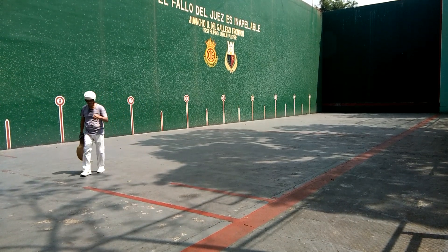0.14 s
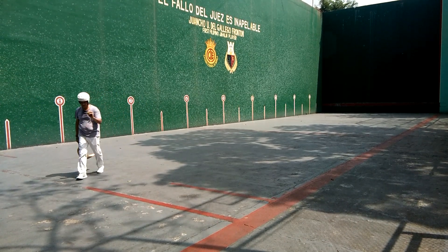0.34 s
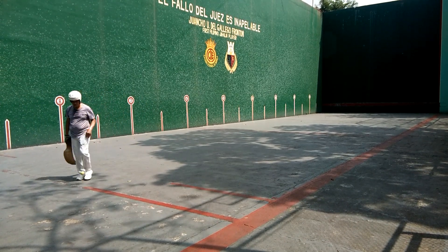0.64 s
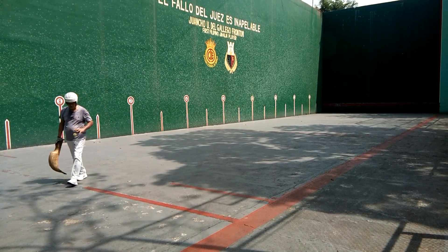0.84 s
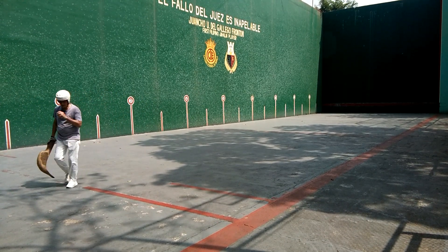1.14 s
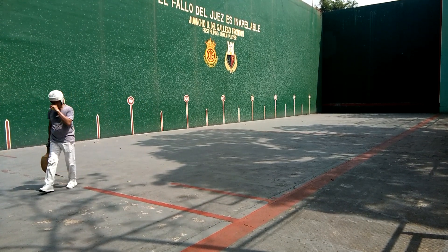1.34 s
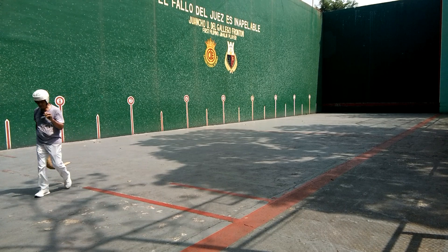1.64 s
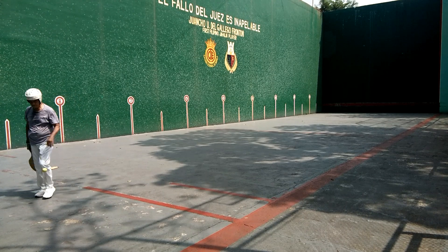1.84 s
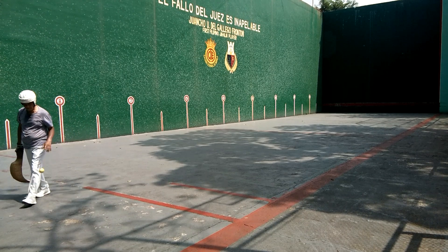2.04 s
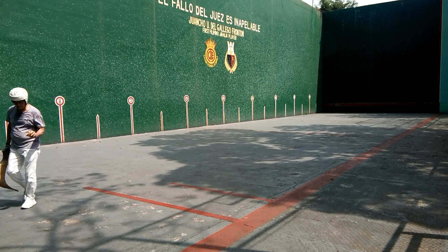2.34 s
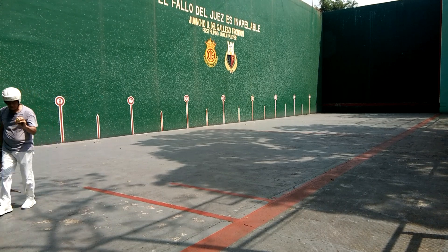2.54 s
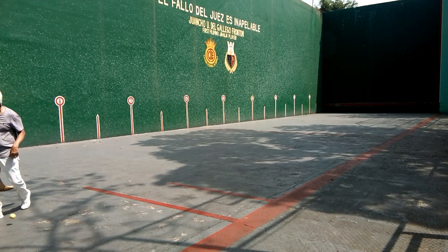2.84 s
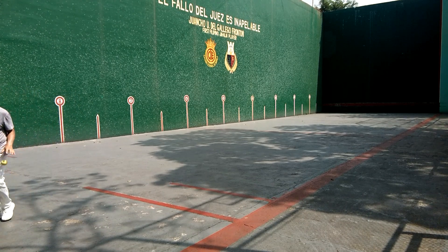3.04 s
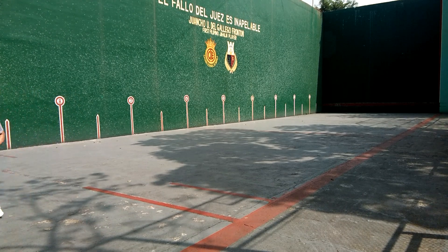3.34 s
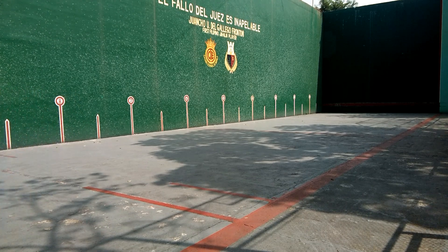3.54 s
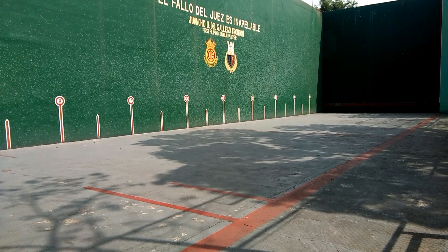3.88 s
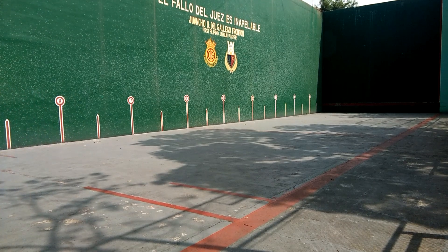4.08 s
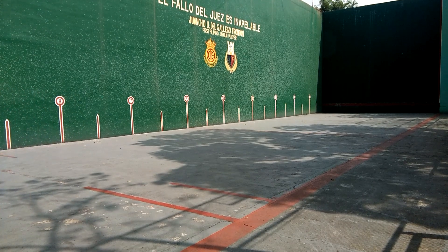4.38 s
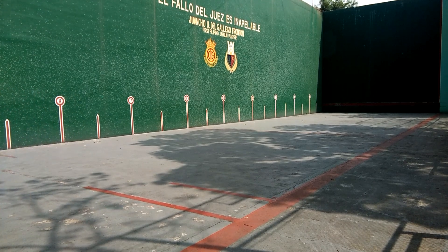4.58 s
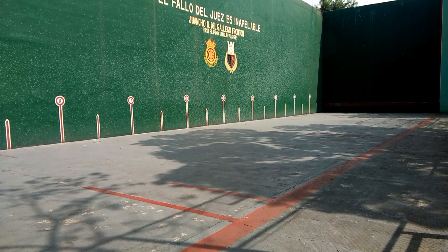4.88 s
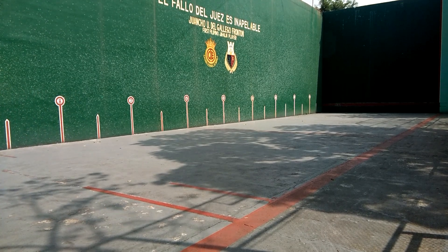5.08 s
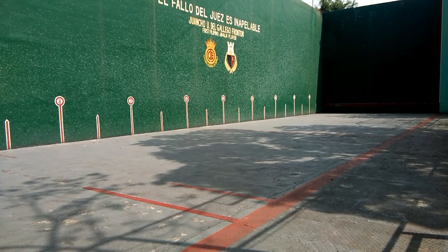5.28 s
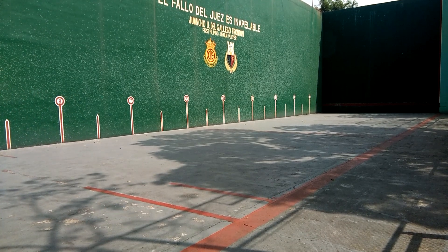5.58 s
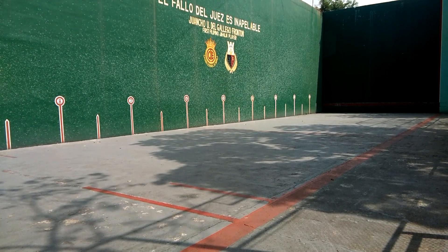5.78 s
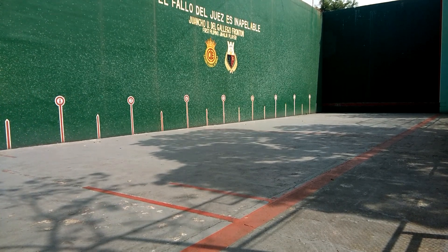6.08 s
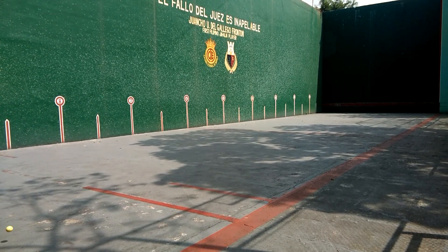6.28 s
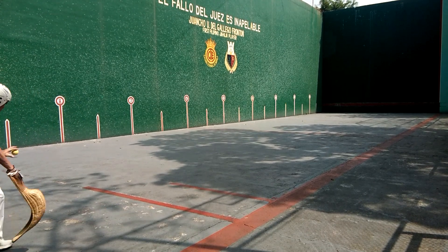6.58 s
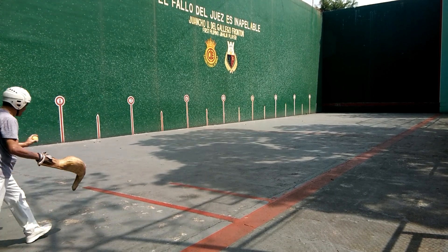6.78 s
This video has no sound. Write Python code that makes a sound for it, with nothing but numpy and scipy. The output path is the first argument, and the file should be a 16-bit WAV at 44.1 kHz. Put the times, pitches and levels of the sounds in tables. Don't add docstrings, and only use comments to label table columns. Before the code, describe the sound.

Six sharp cracks of a small hard ball bouncing on a concrete court, with slapping wall echoes, over buffeting wind and faint town hum.

```python
import sys
import numpy as np
from scipy import signal
from scipy.io import wavfile
from scipy.ndimage import map_coordinates

SR = 44100
rng = np.random.default_rng(int(sys.argv[2]) if len(sys.argv) > 2 else 0)


def gain_from_decibels(decibels):
    exponent = np.asarray(decibels, float) / 20
    return 10 ** exponent


def unload_audio(sound):
    columns = np.transpose(np.atleast_2d(sound))
    steps = np.round(np.clip(columns, -1, 1) * 32767)
    wavfile.write(sys.argv[1], SR, steps.astype(np.int16))


N = 305172


def curve(rows):
    s, *columns = np.transpose(rows)
    return [np.interp(np.arange(N) / SR, s, c) for c in columns]


def band(x, low_hz, high_hz, order=2):
    sos = signal.butter(order, [low_hz, min(high_hz, .45 * SR)], "band", fs=SR, output="sos")
    return signal.sosfilt(sos, x)


def unit(x):
    return x / np.sqrt(np.mean(x ** 2) + 1e-20)


def drift(rate):
    coarse = np.arange(0, N + 32, 32)
    knots = rng.standard_normal(1000)
    slow = map_coordinates(knots, [coarse / SR * rate * 2], order=3)
    return np.interp(np.arange(N), coarse, slow)


def add(out, s, shape):
    i = round(s * SR)
    out[i:i + len(shape)] += shape[:len(out) - i]


def swell(length_s, sharp):
    return np.sin(np.pi * np.arange(round(length_s * SR)) / round(length_s * SR)) ** sharp


def slab_wave(lead_ms, db, last_hz, hang_ms):
    t = np.arange(round(.04 * SR)) / SR * 1000 - lead_ms
    first_hz = 400 + 110 * lead_ms
    hz = last_hz + (first_hz - last_hz) * np.sqrt(np.clip(-t / lead_ms, 0, 1))
    phase = np.cumsum(2 * np.pi * hz / SR)
    phase -= phase[np.argmin(abs(t))]
    growth = np.exp(8 * t / lead_ms ** 2) * np.clip((t + lead_ms) / 1.5, 0, 1)
    decay = np.exp(-t / hang_ms * 2.5)
    size = np.where(t < 0, growth, decay)
    octave = .35 * np.exp(-(t / 2.5) ** 2) * np.sin(2 * phase)
    return -gain_from_decibels(db) * size * (np.sin(phase) + octave)


LEAD_S = .0014


def air_blow(push_db, crack_db, crack_hz, knock_db, near_ms, grit):
    t = np.arange(len(grit)) / SR
    push, bright = np.zeros((2, len(t)))
    add(push, LEAD_S + 0.00027, swell(0.001059, sharp=1.38))
    add(push, 0, -.42 * swell(0.00464, sharp=0.82))
    push = gain_from_decibels(push_db) * (push + .5 * band(push, 1057, 1910, order=1))
    crack = np.sin(2 * np.pi * crack_hz * t) * (t / 0.000086) * np.exp(1 - t / 0.00017) * 0.53
    crack += .5 * band(grit, .68 * crack_hz, 1.4 * crack_hz) * np.exp(-t / .0006)
    crack += 0.079 * band(grit, 6300, 14930) * np.exp(-t / 0.0032)
    knock = band(grit[::-1], 3050, 4430) * (t / 0.0023) * np.exp(1 - t / 0.0012)
    add(bright, LEAD_S, gain_from_decibels(crack_db) * crack + gain_from_decibels(knock_db) * knock)
    lag = round(near_ms * SR / 1000)
    return push + gain_from_decibels(-12.5) * np.roll(push, lag), bright + gain_from_decibels(-7.0) * np.roll(bright, lag)


def ping(db, hz, decay_ms):
    t = np.arange(1500) / SR
    age = t * 1000 / decay_ms
    return gain_from_decibels(db) * np.sin(2 * np.pi * hz * t) * (1 - np.exp(-3 * age)) ** 2 * np.exp(-age)


# time in seconds, push in dB, crack in dB, crack pitch in Hz, knock in dB.
BLOWS = [(.7333, -16.5, -19, 11000, -22.5), (2.0459, -16.5, -21, 13100, -34),
         (2.9712, -16, -21.5, 13100, -24.5), (4.2419, -9, -32, 11000, -25.5),
         (5.4882, -16, -25, 10120, -22), (6.4026, -23.5, -28, 9960, -27.5)]
# frequency in Hz, start in ms after the push, decay in ms.
SHELL_MODES = [(1260, 0.4, 4.0), (1560, -0.4, 4.0), (2950, -0.2, 1.3), (3950, 1.8, 4.0), (5300, 0.2, 1.2)]
MODE_LEVELS = [(-29.5, -31, -29, -42.5, -55), (-36, -34, -33, -37, -42), (-30, -32, -33, -49, -35.5),
               (-25.5, -31, -26, -38, -35.5), (-26, -40, -42, -29.5, -32), (-36, -30.5, -32, -43, -41)]


def shell():
    out = np.zeros(N)
    for (s, _, crack_db, crack_hz, _), levels_db in zip(BLOWS, MODE_LEVELS):
        add(out, s, ping(crack_db - 4.5, 0.761 * crack_hz, decay_ms=0.66))
        for (hz, start_ms, decay_ms), db in zip(SHELL_MODES, levels_db):
            add(out, s + start_ms / 1000, ping(db, hz, decay_ms))
    return out


# crest in seconds, lead in ms, level in dB, last pitch in Hz, hang in ms.
SLAB_WAVES = [(.7315, 7.3, -34.5, 700, 1.3), (2.044, 7.4, -33.5, 520, 3.0), (2.9684, 3.44, -18, 412, 6.2),
              (4.2408, 4, -14, 593, 5.2), (5.4872, 3.76, -17.5, 506, 2.7), (6.4017, 3.2, -23, 476, 5.4)]
NEAR_MS = [3, 3.2, 1.9, 2.6, 3.5, 6.9]
# time in seconds, thud in dB, crack in dB, shell ring in dB.
ECHOES = [(0.770, -22, -32, -40), (.816, -38, -32, -46), (0.9088, -25.5, -47, -49.5),
          (2.065, -33, -31, -57), (2.128, -39, -31, -52), (2.9766, -6, -36, -60), (3.015, -22, -26, -62),
          (3.0542, -20, -19, -63), (4.284, -18.5, -34, -60), (4.325, -25, -19, -59), (5.502, -20, -25, -60),
          (5.5356, -14.5, -24, -38), (5.572, -26.5, -23, -54), (5.6039, -31, -16.5, -53),
          (5.6746, -43, -46, -56), (6.4081, -12, -28, -60), (6.414, -9.5, -31, -62),
          (6.4216, -15, -27, -60), (6.445, -24, -24, -58), (6.4854, -24.5, -23, -64)]


def ball():
    direct, echoes = shell(), np.zeros(N)
    grit = rng.standard_normal((len(BLOWS), 2000))
    next_s = [row[0] for row in BLOWS[1:]] + [N / SR]
    for (s, *blow), slab, near_ms, noise, until in zip(BLOWS, SLAB_WAVES, NEAR_MS, grit, next_s):
        crest_s, lead_ms, *wave_settings = slab
        wave_s = crest_s - lead_ms / 1000
        wave = slab_wave(lead_ms, *wave_settings)
        push, bright = air_blow(*blow, near_ms, noise)
        add(direct, s - LEAD_S, push + bright)
        add(direct, wave_s, wave)
        for echo_s, thud_db, crack_db, ring_db in ECHOES:
            if s < echo_s < until:
                add(echoes, echo_s - LEAD_S, gain_from_decibels(thud_db) * push + gain_from_decibels(crack_db) * bright)
                add(echoes, echo_s - s + wave_s, gain_from_decibels(thud_db) * wave)
                add(echoes, echo_s, ping(ring_db, hz=3700, decay_ms=2.2))
    direct = band(direct, 110, 19000)
    smear = rng.standard_normal(200) * np.exp(-np.arange(200) / 22.)
    return direct, np.convolve(echoes, smear / np.sqrt(np.sum(smear ** 2)))[:N]


# frequency in Hz, tail level in dB, t60 in seconds.
COURT_TAIL = [(199, 6, 0.29), (527, -1.5, 0.83), (1207, -1, 0.67), (1860, -12, 0.81), (2420, -7, .6),
              (3050, -2, .7), (3850, 2, .7), (4850, -12, .5), (6120, -16, 0.88), (11000, -6, 0.57),
              (14700, 5.5, 0.84), (16000, -8, 0.39)]
# thud, ring, crack and top, all in dB.
FILL = [(-54, -65, -56, -65), (-56, -68, -60, -63), (-55, -67, -56.5, -65), (-53.5, -68, -62, -71.5),
        (-54.5, -63, -56, -68), (-54.5, -69, -59.5, -67)]


def court():
    hz, level_db, t60 = np.transpose(COURT_TAIL)
    white, tail = rng.standard_normal((2, N)), 0
    fill_hz = np.log([2000, 3100, 4400, 6000, 11000, 14500])
    edges = 170 * 2 ** np.arange(0, 6.7, 1 / 3)
    for k, (low, high) in enumerate(zip(edges, edges[1:])):
        centre, lift = np.log(low * high) / 2, np.zeros(N)
        for (s, *_), (thud, ring, crack, top) in zip(BLOWS, FILL):
            lift[round(s * SR)] = gain_from_decibels(np.interp(centre, fill_hz, [thud, ring, ring, crack, crack, top]))
        t60s = np.interp(centre, np.log(hz), t60), .07 if low < 2000 else .12, .02
        late, early, rise = (signal.lfilter([1], [1, -gain_from_decibels(-60 / SR / d)], lift) for d in t60s)
        early_share = 1.2 if 2000 < low < 4500 else 2.5
        rise_share = 1.5 if low < 4500 else 3.0
        size = late + early_share * early - rise_share * rise
        gain = gain_from_decibels(np.interp(centre, np.log(hz), level_db))
        tail = tail + gain * size * unit(band(white[k % 2], low, high, order=3))
    return tail * gain_from_decibels(1.3 * drift(60))


# time in seconds, rumble in dB.
BREEZE = [(0, -46.5), (.6, -55.5), (1.0, -47.5), (1.55, -51), (1.9, -45.5), (2.6, -53.5), (2.75, -49),
          (3.35, -50.5), (3.65, -46), (4.2, -48), (4.8, -44), (5.1, -37.5), (5.4, -50.5), (5.65, -51),
          (5.8, -39), (6.92, -44)]
# start in seconds, length in seconds, rumble in dB, flutter in dB above the rumble.
GUSTS = [(.38, 0.09, -43, -38), (0.875, .16, -52, 8.5), (1.263, 0.17, -50, -23), (1.866, 0.15, -44, -30),
         (2.014, 0.44, -72.5, 18.5), (2.791, 0.73, -59.5, 7.5), (3.434, 0.13, -46.5, -4.5),
         (3.695, 0.055, -42, -10), (3.743, 0.18, -31, -7), (3.892, 0.074, -28.5, -7.5),
         (3.95, 0.17, -29.5, -7.5), (4.099, 0.04, -34.5, -3.5), (4.131, 0.091, -29, -5),
         (4.205, 0.093, -29, -9.5), (4.325, 0.044, -37, -5), (4.429, 0.1, -37, 6.5),
         (4.531, .14, -48.5, 15), (4.677, 0.034, -47, 6.5), (4.897, 0.028, -35, -7),
         (4.957, 0.055, -29.5, -13), (5.128, 0.11, -38.5, 0), (5.239, 0.11, -42, -6),
         (5.666, 0.14, -42.5, -1), (5.864, 0.037, -51, 18), (6.004, 0.13, -54, 13), (6.232, 0.06, -42.5, 0),
         (6.278, 0.092, -35.5, -6), (6.438, 0.19, -46.5, 10), (6.667, 0.12, -30, -15),
         (6.79, 0.061, -45.5, -8.5)]
# time in seconds, peak in dB, frequency in Hz.
BUFFETS = [(0.96, -25.5, 209), (1.957, -30, 85.5), (3.87, -22, 260), (3.882, -26, 377), (3.899, -24, 420),
           (3.918, -23, 387), (3.906, -26, 73), (4.029, -43, 99.6), (4.06, -17.5, 126), (4.118, -38, 88.8),
           (4.433, -17.5, 128), (4.499, -41, 350), (4.56, -20, 257), (4.909, -25, 125), (5.139, -25, 199),
           (5.189, -13.5, 170), (5.691, -25.5, 192), (5.711, -23, 104), (5.857, -27.5, 238),
           (5.882, -30, 269), (6.009, -26.5, 330), (6.037, -23, 177), (6.233, -16.5, 106.4),
           (6.562, -20, 123), (6.711, -27, 72.6)]


def wind():
    breeze_db, = curve(BREEZE)
    low, fast = gain_from_decibels(breeze_db), gain_from_decibels(breeze_db - 6.5)
    for s, length_s, db, flutter_db in GUSTS:
        add(low, s, gain_from_decibels(db) * swell(length_s, sharp=2.0))
        add(fast, s, gain_from_decibels(db + flutter_db) * swell(length_s, sharp=0.8))
    rumble = unit(band(band(rng.standard_normal(N), 52, 115), 42, 200)) * gain_from_decibels(1.2 * drift(8))
    flutter = unit(band(band(rng.standard_normal(N), 112.5, 271), 90, 420, order=4))
    flutter = flutter * gain_from_decibels(2.83 * drift(18))
    out = gain_from_decibels(-11.0) * (low * rumble + fast * flutter)
    for s, db, hz in BUFFETS:
        shape = swell(2.4 / hz, sharp=2.2)
        t = (np.arange(len(shape)) - len(shape) / 2) / SR
        add(out, s, gain_from_decibels(db - 10.5) * shape * np.sin(2 * np.pi * hz * t))
    return out


# start in seconds, length in seconds, level in dB, centre in Hz, width in octaves.
SCUFFS = [(.355, .015, -76, 11000, 1.2), (2.478, 0.046, -76, 6050, 2.5), (3.769, 0.0054, -68, 10000, 1.5),
          (3.772, 0.051, -76, 10500, 0.55), (3.956, 0.012, -78.5, 10000, 1.2),
          (4.322, 0.085, -64.5, 6000, 1.5), (4.33, .06, -72, 11000, 0.57), (4.396, 0.008, -74, 8000, 2.0),
          (4.493, 0.081, -74, 9900, 1.1), (4.738, .008, -77, 8000, 2), (4.772, .008, -78, 8000, 1.5),
          (4.98, .008, -77, 11000, .8), (4.999, 0.011, -72, 8000, 3.3), (5.588, 0.051, -65, 10000, 1.4)]


def shoes():
    grit_db = 4.1 * rng.standard_normal(N // 40 + 1).repeat(40)[:N]
    out, grit = np.zeros(N), rng.standard_normal(N) * gain_from_decibels(grit_db)
    for s, length_s, db, hz, octaves in SCUFFS:
        shape, half = swell(length_s, sharp=0.89), 2 ** (octaves / 2)
        hiss = band(grit[round(s * SR):][:len(shape)], hz / half, hz * half)
        add(out, s, gain_from_decibels(db) * shape * unit(hiss))
    return out


# time in seconds, centre in Hz, level in dB.
BIRD = [(3.2, 4860, -95), (3.235, 4850, -78), (3.26, 4810, -75), (3.292, 4770, -70), (3.342, 4700, -67),
        (3.53, 4640, -75), (3.642, 4580, -85), (3.8, 4600, -90)]


def bird():
    hz, db = curve(BIRD)
    phase = np.cumsum(2 * np.pi * hz / SR)
    spread = signal.sosfilt(signal.butter(6, 290, fs=SR, output="sos"), rng.standard_normal((2, N)))
    trill = unit(spread[0] * np.cos(phase) + spread[1] * np.sin(phase)) * gain_from_decibels(.5 * drift(22))
    trill = trill + 0.35 * unit(band(rng.standard_normal(N), 3200, 5100))
    t = np.arange(N) / SR
    return gain_from_decibels(db) * trill * ((t > BIRD[0][0]) & (t < BIRD[-1][0]))


# start in seconds, length in seconds, level in dB, frequency in Hz.
SQUEAKS = [(3.85, .5, -91, 14600), (3.3, .15, -86, 8880), (5.8, .3, -80, 14600), (4.97, .12, -80, 3270),
           (6.0, .5, -84, 2400), (6.7, .2, -83, 2480)]


def squeaks():
    out = np.zeros(N)
    for s, length_s, db, hz in SQUEAKS:
        age = np.arange(round(length_s * SR)) / length_s / SR
        size = np.minimum(age * 12, 1) * (1 - age) ** 2
        add(out, s, gain_from_decibels(db) * size * np.sin(2 * np.pi * hz * age * length_s))
    return out * gain_from_decibels(2 * drift(29))


# frequency in Hz, density in dB per Hz.
TOWN_SPECTRUM = [(88, -31), (150, -1), (230, -10.5), (382, -11.5), (474, -12.5), (575, -12), (756, -17.5),
                 (1030, -15), (1280, -20), (2960, -28), (8310, -38.5), (10900, -35.5), (15800, -37.5)]
# time in seconds, level in dB.
TOWN_LEVEL = [(0.0, -71), (1.02, -67.5), (1.39, -71.5), (2.45, -68), (3.79, -70.5), (4.47, -67),
              (4.68, -70.5), (5.47, -71.5), (5.63, -68), (6.92, -71.5)]


def town():
    level_db, = curve(TOWN_LEVEL)
    hz, db = np.transpose(TOWN_SPECTRUM)
    white, out = rng.standard_normal((2, N)), 0
    edges = 130 * 2 ** np.arange(0, 7.1, .5)
    for k, (low, high) in enumerate(zip(edges, edges[1:])):
        centre = np.sqrt(low * high)
        swing_db = (level_db - level_db.mean()) * np.clip(1500 / centre, 0, 1)
        gain = gain_from_decibels(np.interp(np.log(centre), np.log(hz), db) + swing_db + 0.8 * drift(8.8))
        out = out + gain * band(white[k % 2], low, high)
    whine_hz = 2115 + 4 * drift(2.7)
    whine = gain_from_decibels(-86 + drift(0.77)) * np.sin(np.cumsum(2 * np.pi * whine_hz / SR))
    return gain_from_decibels(-66) * unit(out) + whine


def scene():
    direct, echoes = ball()
    faint = echoes + court() + shoes() + bird() + squeaks() + town() + wind()
    faint = signal.sosfilt(signal.cheby2(10, 40, 15900, fs=SR, output="sos"), faint)
    return (direct + faint)[None]


def top_cut(x):
    return signal.sosfilt(signal.butter(12, 16670, fs=SR, output="sos"), x)


def record(dry):
    dry = signal.sosfilt(signal.butter(2, 32, "high", fs=SR, output="sos"), dry)
    mix = signal.sosfilt(signal.cheby2(12, 60, 17000, fs=SR, output="sos"), dry)
    return top_cut(mix)


dry = scene()
out = record(dry)
unload_audio(out)
```